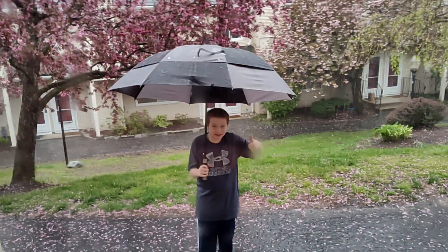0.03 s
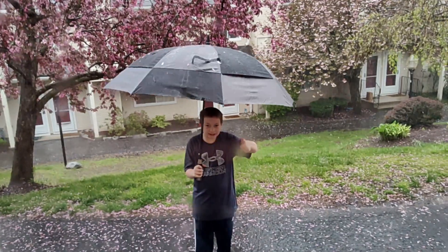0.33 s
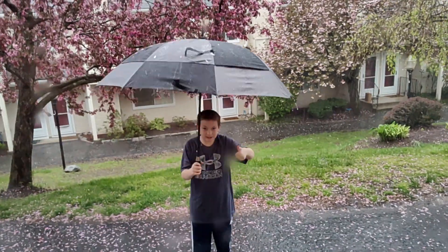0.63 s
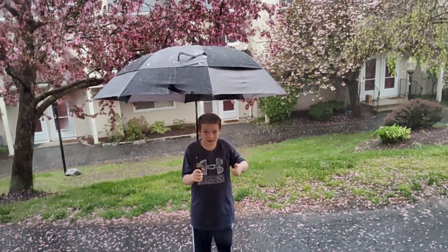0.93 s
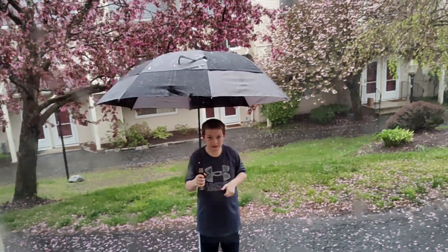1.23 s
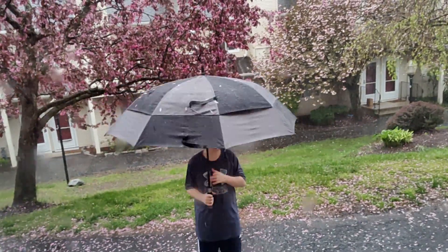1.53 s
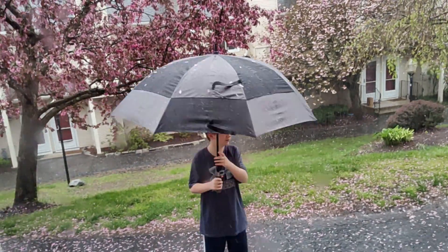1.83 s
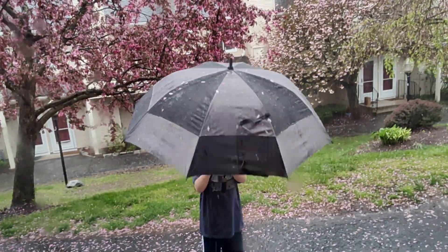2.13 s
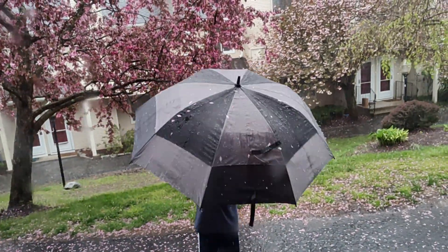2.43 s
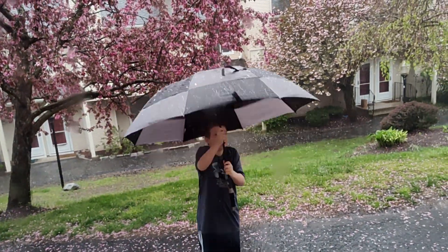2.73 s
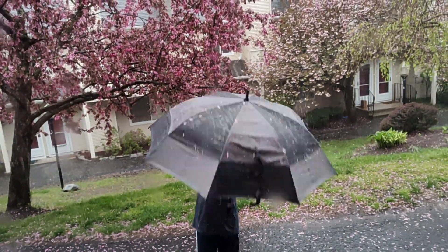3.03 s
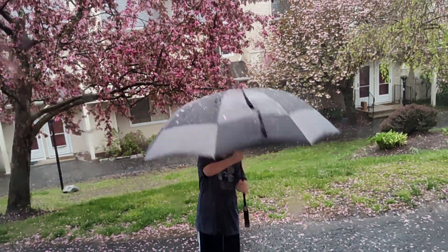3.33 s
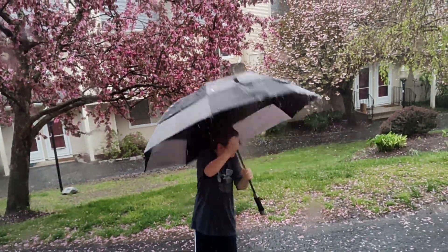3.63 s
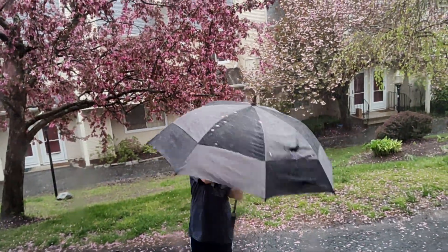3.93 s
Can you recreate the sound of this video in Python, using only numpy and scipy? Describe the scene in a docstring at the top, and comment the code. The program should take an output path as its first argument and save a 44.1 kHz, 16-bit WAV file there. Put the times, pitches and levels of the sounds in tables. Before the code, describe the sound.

Rain drums on an umbrella over the hiss of wet leaves and pavement.

```python
"""Steady rain in a garden, heard close to an open umbrella.
After a quarter second of silence the rain fades in, bass last: drops patter on taut fabric over the
hiss of wet leaves and asphalt, with faint wind and a hum underneath. Heavy drips soon thud on the
canopy, and from about one second others burst in bright splashes. Wet spatter comes in flurries,
and the thickest one, just before the end, brings a quick run of thuds."""
import sys
import numpy as np
from scipy import signal
from scipy.fft import rfft, irfft
from scipy.io import wavfile
from scipy.ndimage import uniform_filter1d

SR = 44100
rng = np.random.default_rng(int(sys.argv[2]) if len(sys.argv) > 2 else 0)


def store_pcm(level_fs):
    """Save levels as 16-bit WAV."""
    pcm = np.round(np.clip(level_fs, -1, 1) * 32767).astype(np.int16)
    wavfile.write(sys.argv[1], SR, np.atleast_2d(pcm).T)


N = 176400
DROP_T60_S, DROP_RISE_S = 0.018, 0.00049

# Faders for the drumming, the hollow note and the low ring. Each row: time in seconds, level in dB.
DRUM_FADER = [(.27, -53.5), (.34, -41.5), (.55, -41.5), (.87, -44), (1.3, -42.5), (1.64, -46), (1.9, -42),
              (2.03, -45), (2.13, -41.5), (2.7, -41.5), (2.9, -40), (3.06, -46.5), (3.3, -42), (3.64, -41),
              (3.84, -38), (3.89, -43.5), (3.96, -41), (4.0, -46)]
HOLLOW_FADER = [(.27, -58), (.36, -43.5), (.65, -42.5), (1.3, -46.5), (2, -50), (3, -56)]
RING_FADER = [(.27, -81), (.7, -59), (1.25, -61), (1.5, -49.5), (2.5, -58), (3.3, -53.5), (4, -54.5)]
# Canopy modes, hollow and low. Each row: pitch in Hz, relative gain in dB, t60 in seconds.
HOLLOW_TONES = [(647, 0.5, .017), (1600, 2.5, 0.01)]
RING_TONES = [(237.5, -5.5, 0.28), (261, -14.5, 0.74), (286.5, 2, 0.19), (332.6, 0.5, 0.17)]
def patter():
    """Rain drums on the fabric, sounds its hollow note and keeps its low modes ringing."""
    hits = shower(per_s=1300, spread_db=3, t60=DROP_T60_S)
    drum = unit_rms(colour(hits, fabric_db)) * fader(DRUM_FADER) * amp(0.98)
    sparse_hits = shower(per_s=250, spread_db=1.5, t60=DROP_T60_S)
    hollow = canopy(colour(sparse_hits, fabric_db), HOLLOW_TONES) * fader(HOLLOW_FADER)
    ring = canopy(hits, RING_TONES) * fader(RING_FADER)
    return drum + hollow + ring


# EQ of the drumming fabric. Each row: frequency in Hz, gain in dB.
FABRIC_EQ = [(130, -24), (165, -22), (210, -10), (330, -5.5), (450, -10), (570, -2), (654, -2), (830, -2),
             (915, -8.5), (1230, -2.5), (1390, -5.5), (1590, -3.5), (1850, -8), (2250, -10), (2600, -16),
             (3000, -9)]
def fabric_db(hz):
    """The fabric's response: full mids, rolled off at both ends."""
    treble_cut = 16 * np.log2(np.maximum(hz / 2200, 1)) ** 2
    bass_cut = 14 * np.log2(np.maximum(140 / (hz + 1), 1))
    return curve(FABRIC_EQ, hz) - treble_cut - bass_cut


def canopy(hits, modes, drift=0.014, drift_step_s=0.248):
    """The canopy's modes ring and drift in pitch as the fabric tightens and slackens."""
    t, knots = np.arange(N) / SR, np.arange(64) * drift_step_s
    stretch = 1 + drift * np.interp(t, knots, rng.standard_normal(len(knots)))
    out = np.zeros((2, N))
    for hz, db, t60 in modes:
        carrier = np.exp(2j * np.pi * np.cumsum(hz * stretch) / SR)
        feedback = amp(-60 / (t60 * SR))
        envelope = signal.lfilter([1], [1, -feedback], hits / carrier)
        out += amp(db) * (carrier * envelope).real
    return unit_rms(out)


# Heavy drips. Each row: start in seconds, peak in dB before the trim, pitch of the struck spot in Hz.
THUD_CUES = [(.342, -27.5, 622), (.395, -27, 595), (.529, -24.5, 646), (.781, -24, 751), (.865, -27, 750),
             (1.071, -23.5, 624), (1.509, -29, 700), (2.06, -30, 708), (2.111, -23.5, 676),
             (2.209, -24.5, 832), (2.376, -23.5, 643), (2.676, -23, 775), (2.909, -23.5, 1190),
             (3.401, -25, 866), (3.689, -27, 705), (3.709, -21.5, 1100), (3.772, -22, 1630),
             (3.796, -23, 1830), (3.836, -18.5, 900), (3.853, -21.5, 1400)]
def thuds(trim_db=-2.5, fall_db_per_oct=5):
    """Heavy drips strike the same fabric; each spot favours its own pitch."""
    out = np.zeros((2, N))
    for start, db, spot_hz in THUD_CUES:
        hit = colour(impact(t60=0.019, rise_s=DROP_RISE_S),
                     lambda hz: fabric_db(hz) - fall_db_per_oct * abs(np.log2((hz + 1) / spot_hz)))
        add(out, start, hit / abs(hit).max() * amp(db + trim_db))
    return out


# Flurries of spatter. Each row: time in seconds, level in dB.
SPATTER_FADER = [(.27, -48), (.37, -45), (.53, -41.5), (.8, -45), (1.1, -52), (2.1, -48), (2.6, -50.5),
                 (2.78, -45), (2.9, -47), (3.03, -49.5), (3.36, -40.5), (3.55, -54), (3.67, -53),
                 (3.71, -43), (3.8, -38.5), (3.86, -39), (3.88, -55), (4, -70)]
# Spatter EQ. Each row: frequency in Hz, relative gain in dB.
SPATTER_EQ = [(200, -28), (700, -11), (1100, 3), (1400, -4.5), (1750, 5.5), (2100, -2.5), (3200, -2.5),
              (5000, -10.5), (9000, -42), (16000, -62)]
def spatter():
    """Brighter, wetter drops hit the umbrella in flurries."""
    drops = shower(per_s=2200, spread_db=4, t60=0.012)
    return equalise(drops, SPATTER_EQ) * fader(SPATTER_FADER)


# Splashing drips. Each row: start in seconds, peak in dB before trim and pan, left minus right in dB,
# band centre in Hz, t60 in seconds.
SPLASH_CUES = [(.878, -49, 1.5, 8500, .04), (.938, -45, 2, 9600, .055), (1.188, -34, 3, 5750, .08),
               (1.467, -47, 2, 8500, .04), (1.559, -42, 8, 7400, 0.064), (1.833, -43, 4, 7900, .07),
               (1.901, -51, 3, 8500, .04), (2.112, -52, 2, 9000, .04), (2.482, -43, 3, 9000, .05),
               (2.765, -30.5, 2, 2150, 0.093), (2.882, -35, 4, 3500, .08), (2.943, -42.5, 3.5, 15200, .09),
               (2.946, -44, 2, 9900, .04), (3.397, -44, 2.5, 7800, .06), (3.968, -41, 6, 6150, .05)]
def splashes(trim_db=6, rise_s=0.0044, size=6000):
    """Drips burst on wet fabric or ground, each into a short bright spray."""
    out, t, hz = np.zeros((2, N)), np.arange(size) / SR, np.fft.rfftfreq(size, 1 / SR)
    for start, db, pan_db, centre_hz, t60 in SPLASH_CUES:
        width_oct = 0.34 * np.sqrt(9000 / centre_hz)  # duller splashes are wider
        off_centre = np.log2((hz + 1) / centre_hz) / width_oct
        band = unit_rms(irfft(rfft(stereo_noise(size)) / (1 + off_centre ** 2 / 2) ** 2))
        spray = band * np.minimum(t / rise_s, 1) * amp(-60 * t / t60)
        add(out, start, spray / abs(spray).max() * amp(db + trim_db + pan(pan_db)))
    return out


# Swell of the hiss. Each row: time in seconds, level in dB before the trim.
HISS_FADER = [(.285, -60), (.296, -52.5), (.6, -49.5), (.74, -47), (1.2, -47), (1.4, -47.5), (2.6, -46.5),
              (2.92, -46), (3.05, -48.5), (3.3, -46), (3.55, -47), (3.83, -43.5), (3.92, -50.5),
              (3.97, -46.5), (4, -52)]
# Hiss EQ. Each row: frequency in Hz, relative gain in dB.
HISS_EQ = [(30, -42), (100, -24), (250, 1), (700, 7.5), (1500, 1.5), (2700, -4.5), (3800, -2), (4550, 1.5),
           (5250, -2.5), (6300, 2.5), (7500, -6), (9000, -11.5), (10500, -19.5), (12000, -24), (13500, -23),
           (15200, -22), (16000, -16)]
def hiss(trim_db=7, spray_db=-2.5):
    """Fine near drops land on leaves and asphalt, over the distant wash."""
    bed = unit_rms(wash())
    spray = unit_rms(shower(per_s=2200, spread_db=3, t60=0.0087, rise_s=0.002))
    return equalise(bed + amp(spray_db) * spray, HISS_EQ) * amp(trim_db) * fader(HISS_FADER)


def wash(patchy_db=2.0):
    """Distant rain merges into noise with drifting patches."""
    spectrum = signal.stft(stereo_noise(N), nperseg=512)[2]
    patches = uniform_filter1d(rng.standard_normal(spectrum.shape[1:]), size=22, axis=0)  # across pitch
    patches = unit_rms(uniform_filter1d(patches, size=10, axis=1))  # across time
    return signal.istft(spectrum * amp(patchy_db * patches), nperseg=512)[1][:, :N]


def ticks(centre_hz=8000, level_db=-61):
    """Single small drops tick brightly on the nearest wet ground."""
    drops = shower(per_s=60, spread_db=2.5, t60=0.033, rise_s=0.002)
    bright = colour(drops, lambda hz: -41 * np.log2((hz + 1) / centre_hz) ** 2)
    return unit_rms(bright) * amp(level_db)


# Fizz EQ. Each row: frequency in Hz, relative gain in dB.
FIZZ_EQ = [(100, -20), (2000, 20.5), (4500, -1), (6500, -6), (10500, 10.5), (12500, -2), (15500, -13)]
def fizz(level_db=-59):
    """A thin, steady fizz of background noise."""
    return equalise(stereo_noise(N), FIZZ_EQ) * amp(level_db)


# Swell of the wind. Each row: time in seconds, level in dB.
WIND_FADER = [(.26, -75), (.5, -88), (.7, -65), (.95, -78), (1.25, -71), (2.7, -71), (3.3, -71.5), (4, -71)]
# Wind EQ. Each row: frequency in Hz, relative gain in dB.
WIND_EQ = [(20, -6), (38, -15), (58, 6), (70, 7.5), (82, -8), (110, 1), (145, -0.5), (250, -19), (600, -29),
           (2000, -68)]
def wind():
    """Moving air makes a faint low rumble."""
    return equalise(stereo_noise(N), WIND_EQ, size=16384) * fader(WIND_FADER)


# Swell of the hum. Each row: time in seconds, level in dB.
HUM_FADER = [(.3, -80), (1, -75.5), (2.8, -82), (3.1, -70.5), (3.5, -67), (3.65, -81), (4, -78)]
def hum(centre_hz=101.8, half_width_hz=3.1):
    """A narrow band of noise wavers as a low hum far away."""
    off_centre = (np.fft.rfftfreq(N, 1 / SR) - centre_hz) / half_width_hz
    band = irfft(rfft(stereo_noise(N)) / (1 + off_centre ** 4), N)
    return unit_rms(band) * fader(HUM_FADER)


def echo(x, t60=0.17, crossfade_s=0.299, size=8192, count=6):
    """Ground and nearby walls throw back a short diffuse tail, which changes as the umbrella moves."""
    t, place, out = np.arange(size) / SR, np.arange(N) / SR / crossfade_s, np.zeros((2, N))
    for k in range(count):
        tail = stereo_noise(size) * amp(-60 * t / t60) * (t > .005)
        send = np.sqrt(np.maximum(1 - abs((place - k + 1) % count - 1), 0))  # the tails take turns
        out += signal.oaconvolve(x * send, tail / np.linalg.norm(tail[0]), axes=1)[:, :N]
    return out


def shower(per_s, spread_db, t60, rise_s=DROP_RISE_S, count=48):
    """Drops of random size land at random times on many spots, each with its own short decay."""
    out = np.zeros((2, N))
    spots = [impact(t60 * 2 ** rng.uniform(-1.02, 1), rise_s) for _ in range(count)]
    for when, size, spot in rng.random((int(per_s * N / SR), 3)):
        db = spread_db * min(-np.log(1 - size), 3.6)  # many soft drops, few loud ones
        add(out, when * N / SR, amp(db) * spots[int(spot * count)])
    return out


def impact(t60, rise_s, size=2048):
    """One drop lands: a noise burst with a fast attack and a short decay."""
    t = np.arange(size) / SR
    return unit_rms(stereo_noise(size) * (1 - np.exp(-t / rise_s)) ** 2 * amp(-60 * t / t60))


# Stereo width. Each row: frequency in Hz, left-right correlation (clipped to -1..1 in use).
EAR_LIKENESS = [(60, 7), (260, 0.8), (430, 0.47), (640, 0.92), (800, .45), (1000, -0.2), (1250, 0.7),
                (1380, -0.76), (1570, 0.2), (1850, -0.22), (2250, 0.42), (3200, 0.01), (8000, 0)]
def stereo_noise(size):
    """White noise at two ears: alike in the bass, unrelated in the treble."""
    left, other = rfft(rng.standard_normal((2, size)))
    likeness = np.clip(curve(EAR_LIKENESS, np.fft.rfftfreq(size, 1 / SR)), -1, 1)
    right = likeness * left + np.sqrt(1 - likeness ** 2) * other
    return irfft(np.array([left, right]), size)


# Pan by band. Each row: frequency in Hz, left minus right in dB.
BAND_PAN = [(60, 2.5), (83, -2), (110, -1), (160, -1), (220, 1), (300, 0.5), (420, 0.5), (580, 0.5),
            (810, -2), (1120, -0.5), (1540, -2), (2140, -1), (2960, 1.5), (4090, -3), (5660, 5), (7830, 6),
            (10800, -4), (15000, 7.5)]
def colour(x, shape_db, size=4096):
    """Minimum-phase filter with the gain shape_db(Hz), panned band by band."""
    hz = abs(np.fft.fftfreq(size, 1 / SR))
    log_gain = np.log(amp(np.maximum(shape_db(hz), -100) + pan(curve(BAND_PAN, hz))))
    response = np.exp(np.conj(signal.hilbert(log_gain)))
    taps = np.fft.ifft(response).real[:, :size // 2]
    return signal.oaconvolve(x, taps, axes=1)[:, :x.shape[1]]


def equalise(x, eq, size=4096):
    """Colours a sound with an EQ table, at rms 1."""
    return unit_rms(colour(x, lambda hz: curve(eq, hz), size))


def curve(points, hz):
    """Reads a table on a log-frequency axis."""
    knots_hz, values = np.transpose(points)
    return np.interp(np.log(hz + 1), np.log(knots_hz + 1), values)


def fader(points):
    """A level curve as gain per sample."""
    return amp(np.interp(np.arange(N) / SR, *np.transpose(points)))


def pan(db):
    """Splits a left-minus-right level between the ears."""
    return np.array([[.5], [-.5]]) * db


def amp(db):
    """Decibels to gain."""
    return 10 ** (np.asarray(db) / 20)


def unit_rms(x):
    """Scales to rms 1."""
    return x / np.sqrt(np.mean(x ** 2) + 1e-20)


def add(mix, start, sound):
    """Mixes a stereo sound in at start seconds."""
    part = mix[:, round(start * SR):][:, :sound.shape[1]]
    part += sound[:, :part.shape[1]]


def scene(echo_db=-8.5):
    """The close rain and its echo, over the garden's rain, a thin fizz, wind and hum."""
    near = patter() + spatter() + thuds() + splashes()
    return near + amp(echo_db) * echo(near) + hiss() + ticks() + fizz() + wind() + hum()


def record(dry, start_s=0.255, bass_hz=380, bass_fade_s=0.32, top_hz=15850):
    """Silence, then a quick fade in with the bass arriving last, all through a steep high cut."""
    age = np.maximum(np.arange(N) / SR - start_s, 0)
    fade = np.minimum(age / 0.00079, 1) * amp(-5 * np.exp(-age / 0.014))
    thin = signal.sosfiltfilt(signal.butter(1, bass_hz, "high", fs=SR, output="sos"), dry)
    bass = (dry - thin) * np.minimum(age / bass_fade_s, 1) ** 2
    high_cut = signal.firwin(801, top_hz, window=("kaiser", 9), fs=SR)
    return signal.oaconvolve((thin + bass) * fade, high_cut[None], "same")


dry = scene()
out = record(dry)
store_pcm(out)
```